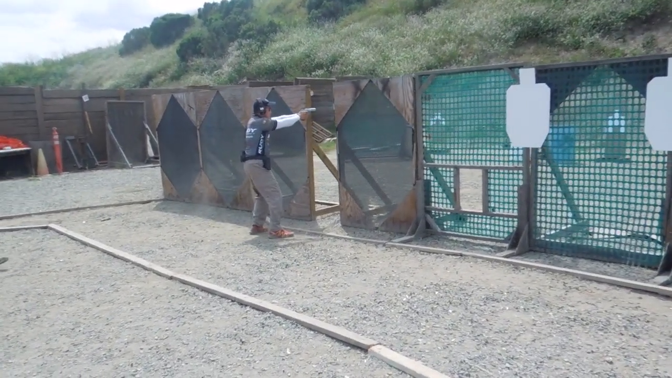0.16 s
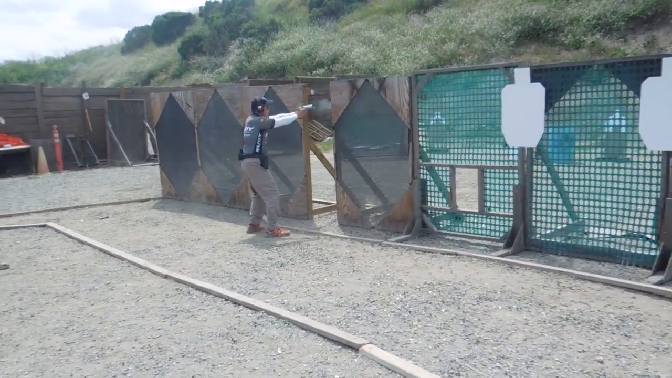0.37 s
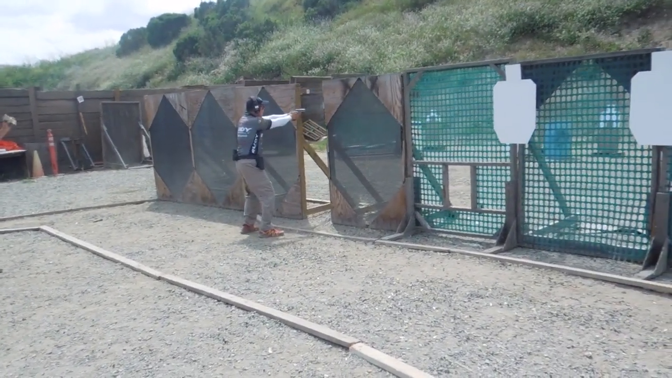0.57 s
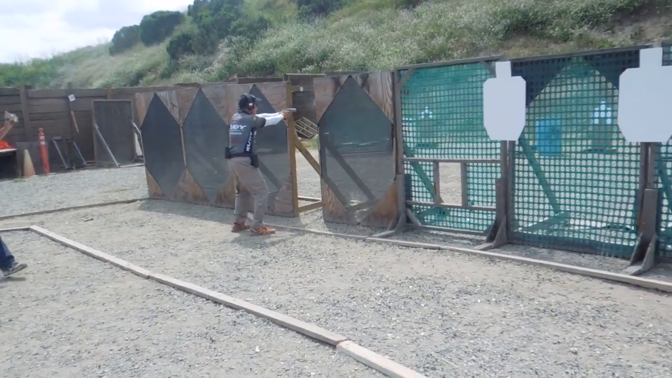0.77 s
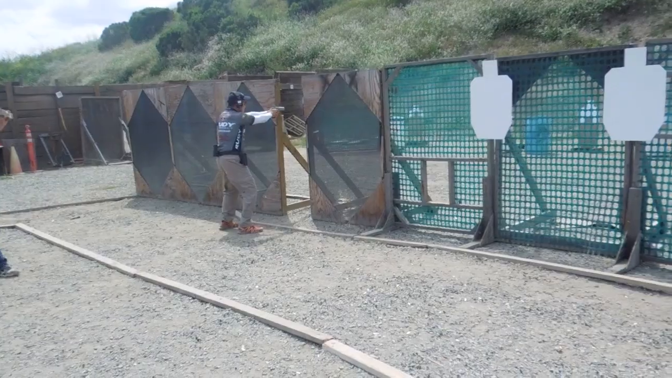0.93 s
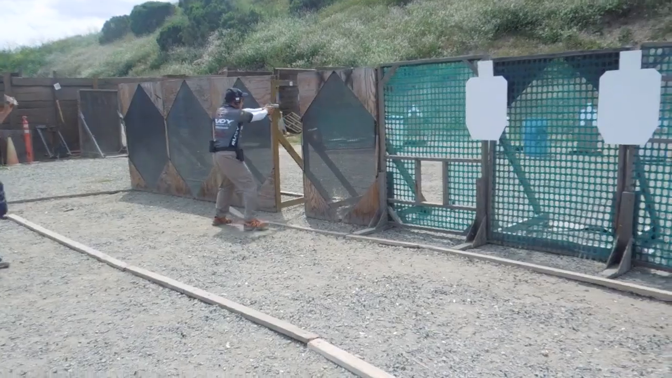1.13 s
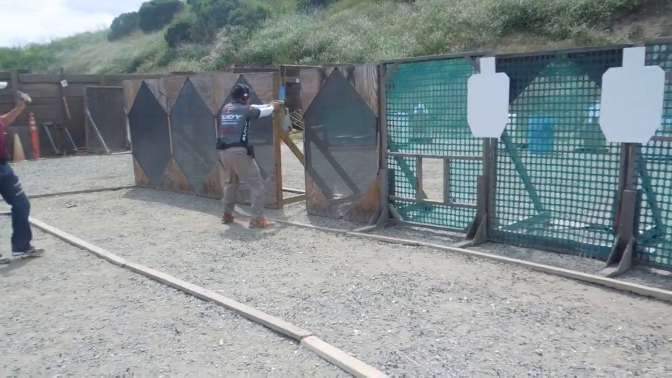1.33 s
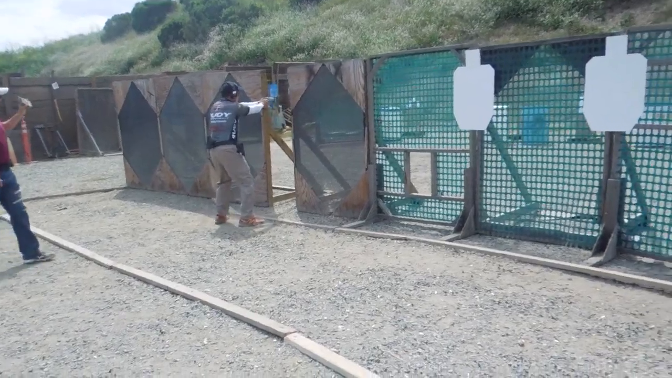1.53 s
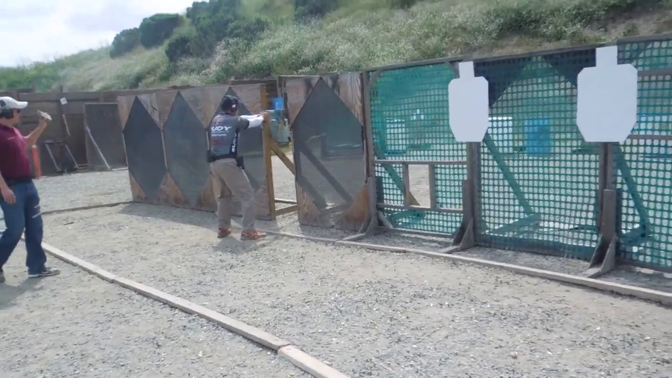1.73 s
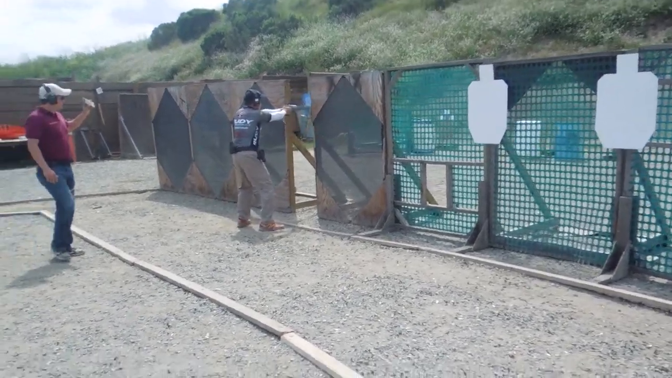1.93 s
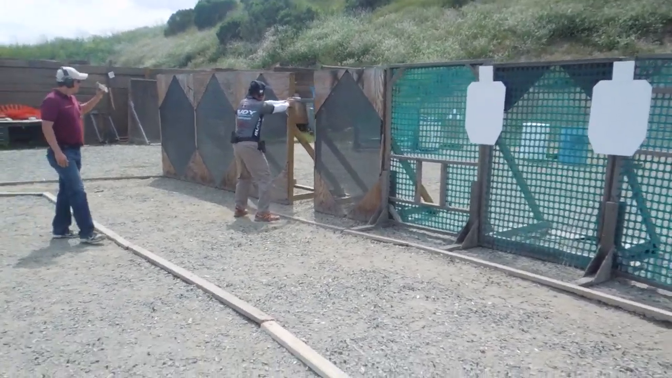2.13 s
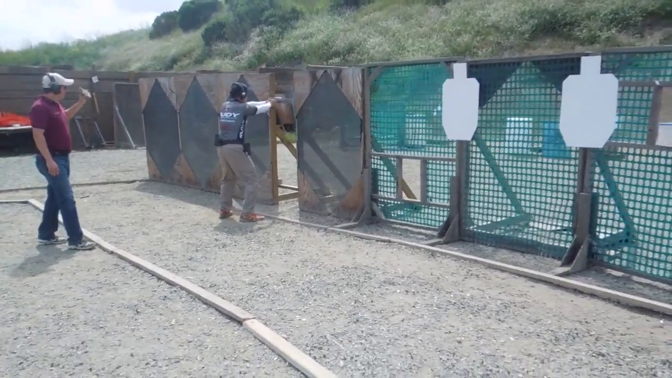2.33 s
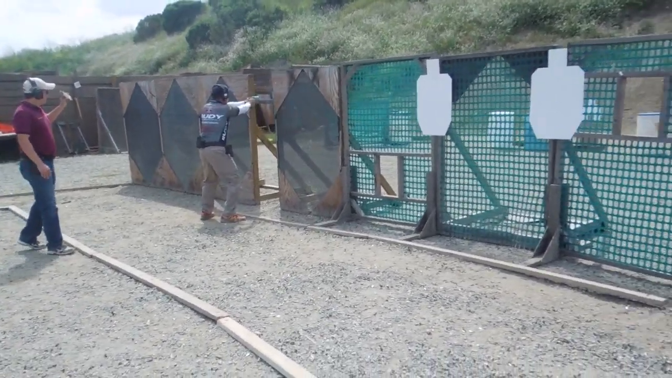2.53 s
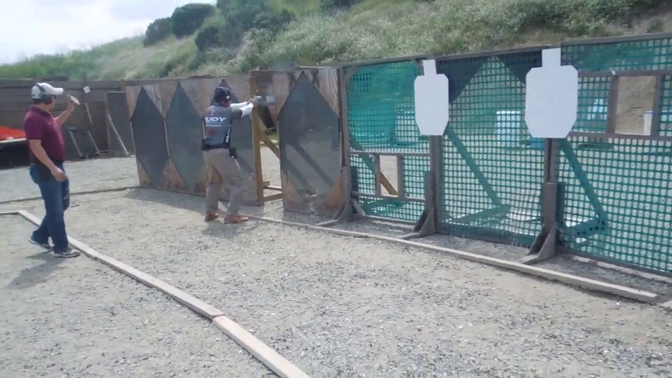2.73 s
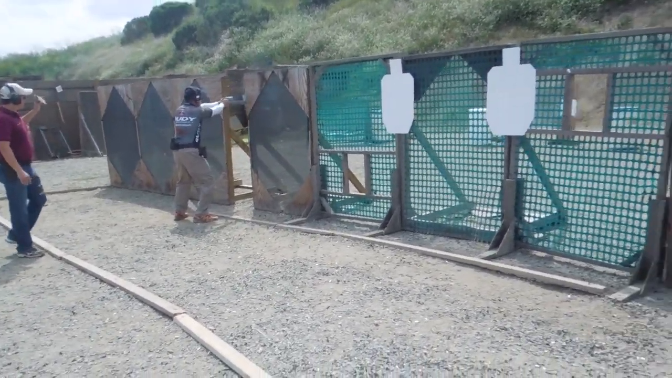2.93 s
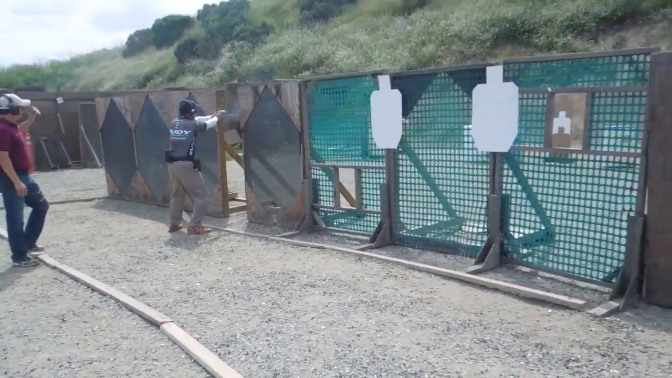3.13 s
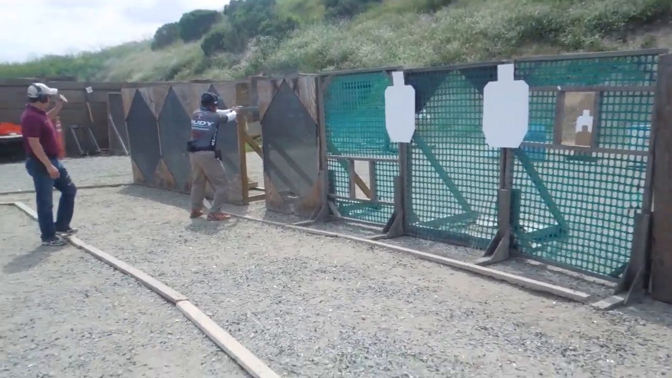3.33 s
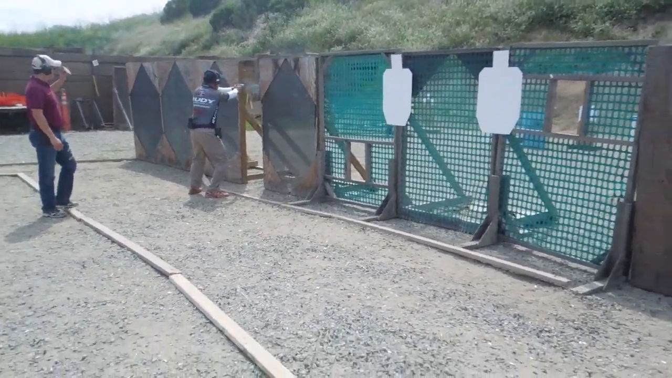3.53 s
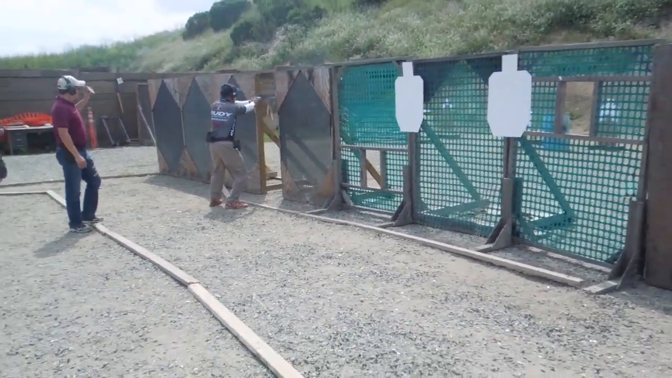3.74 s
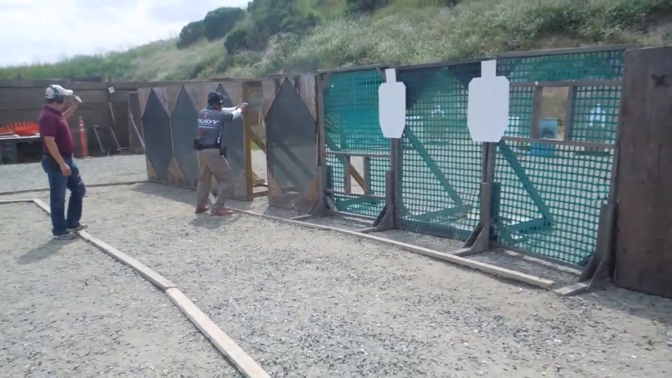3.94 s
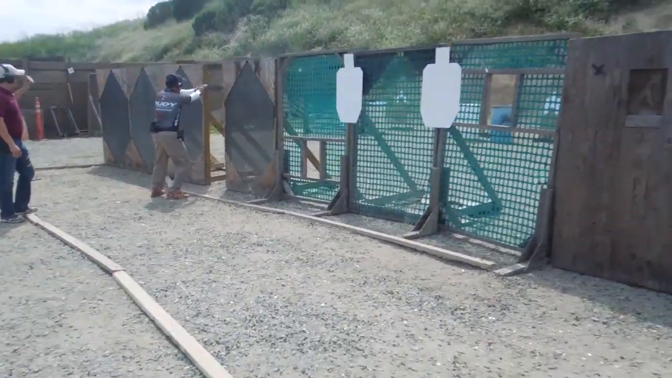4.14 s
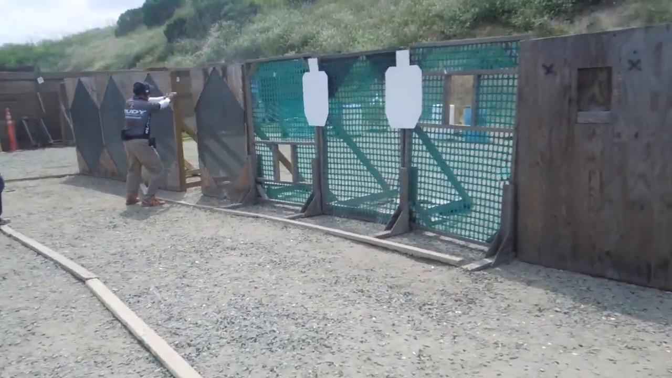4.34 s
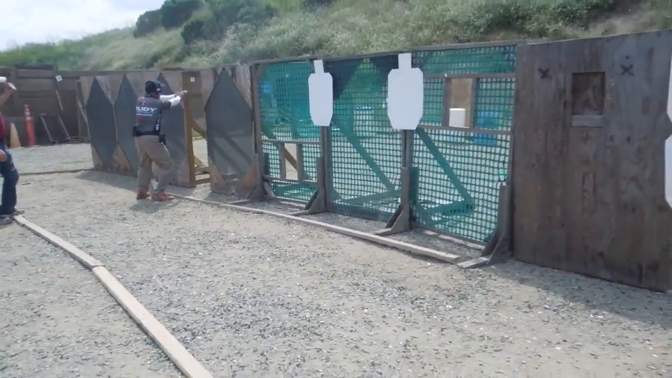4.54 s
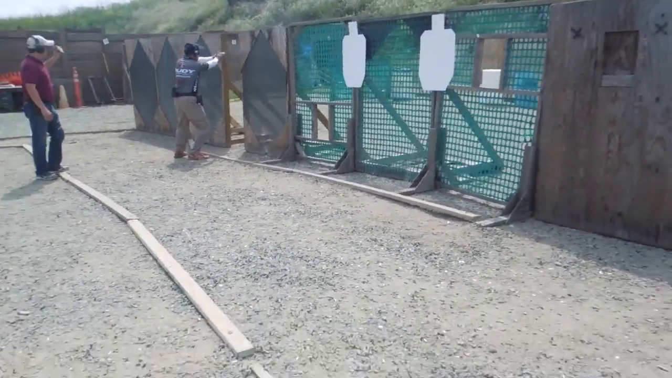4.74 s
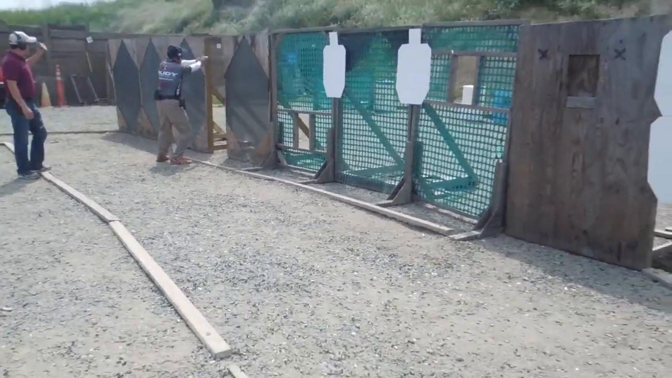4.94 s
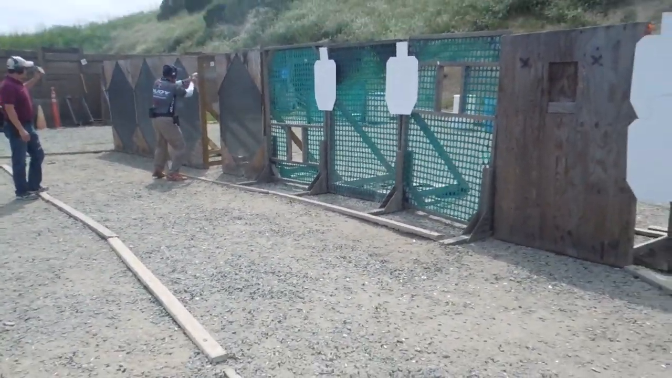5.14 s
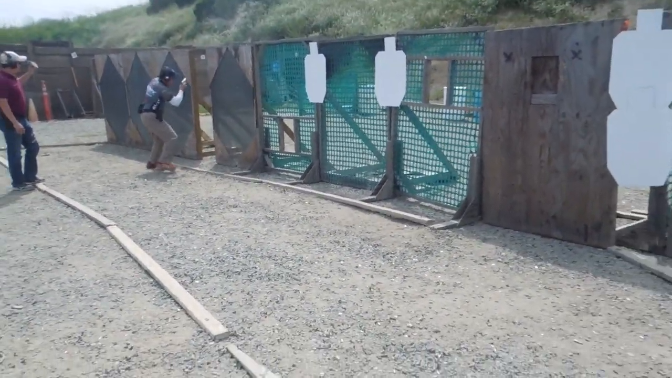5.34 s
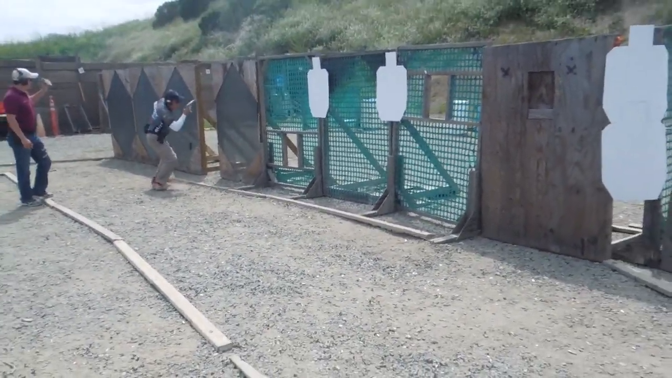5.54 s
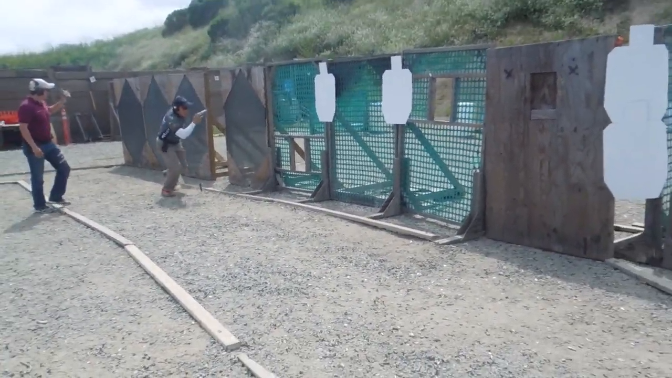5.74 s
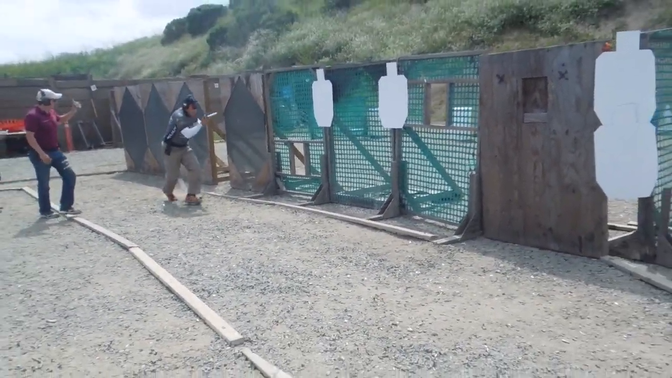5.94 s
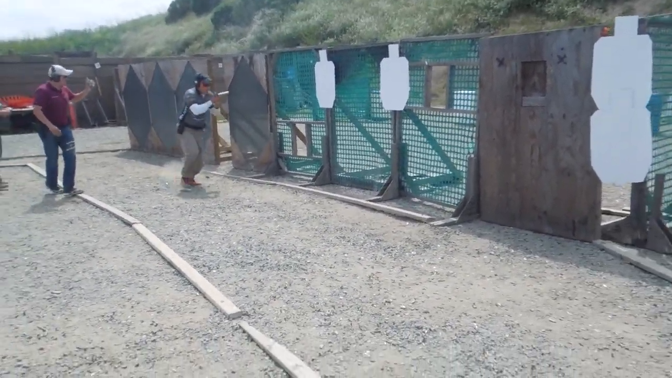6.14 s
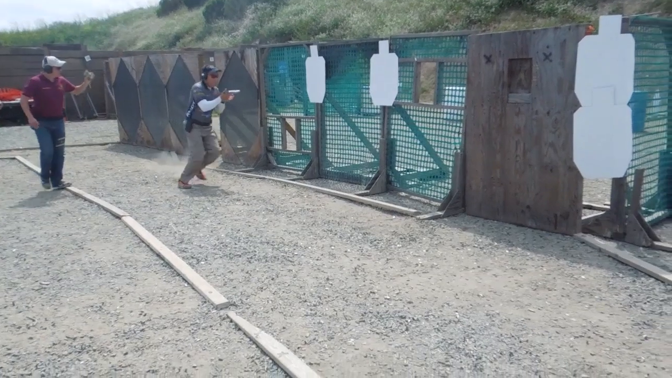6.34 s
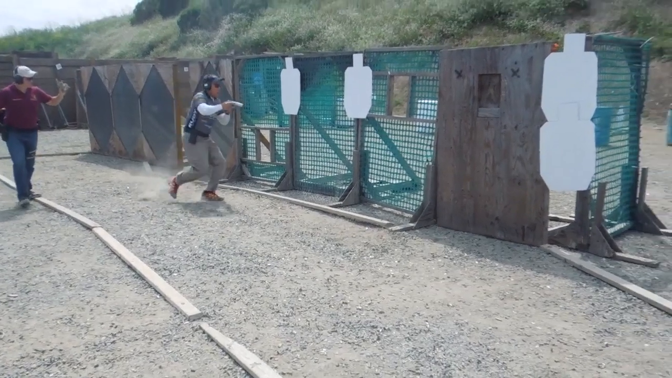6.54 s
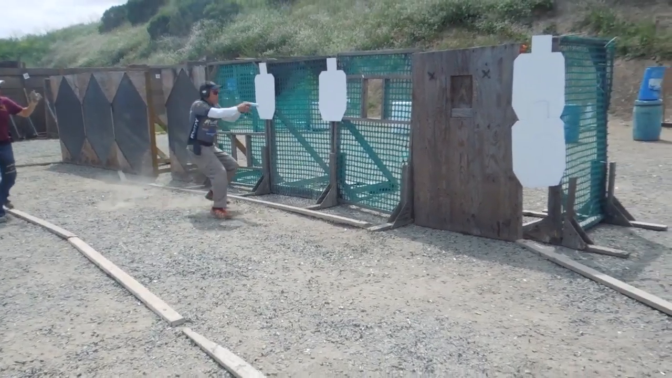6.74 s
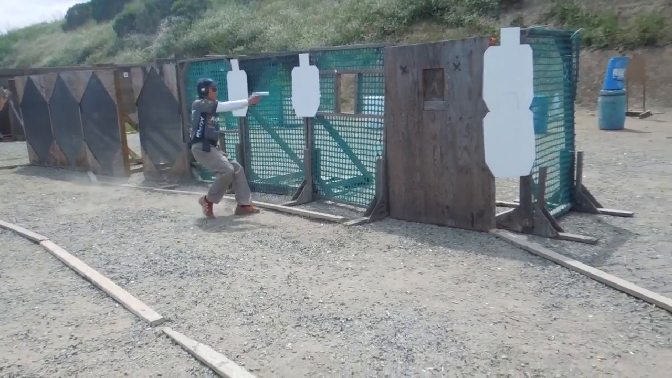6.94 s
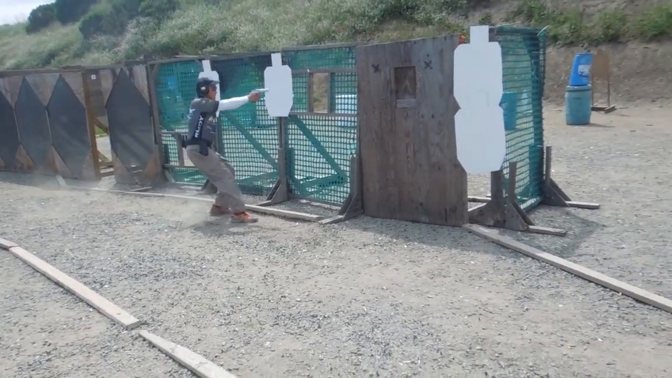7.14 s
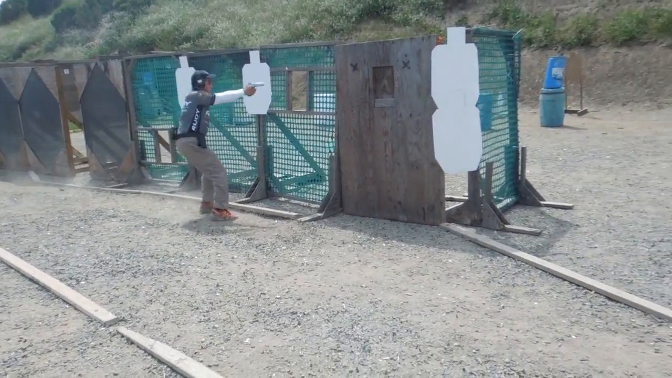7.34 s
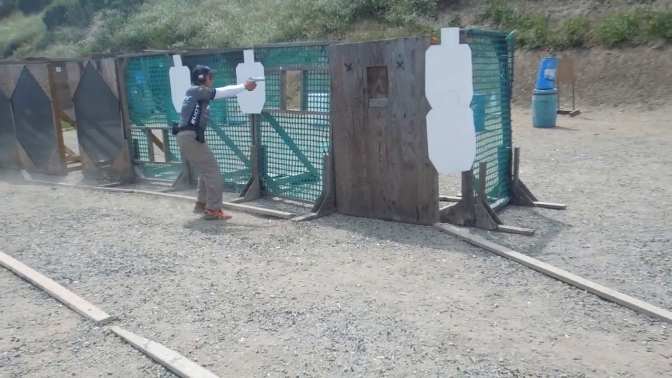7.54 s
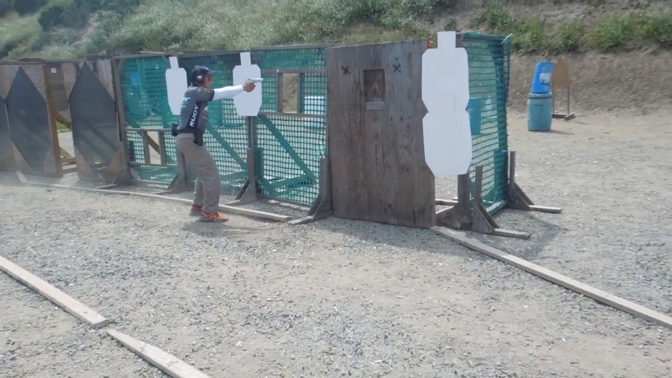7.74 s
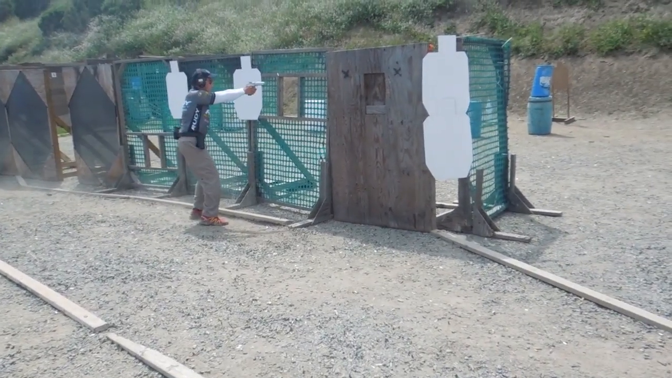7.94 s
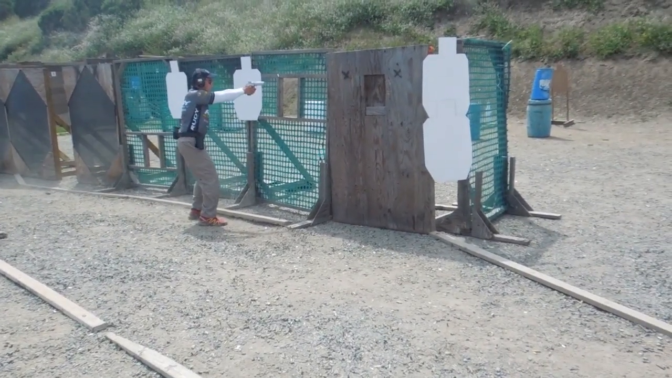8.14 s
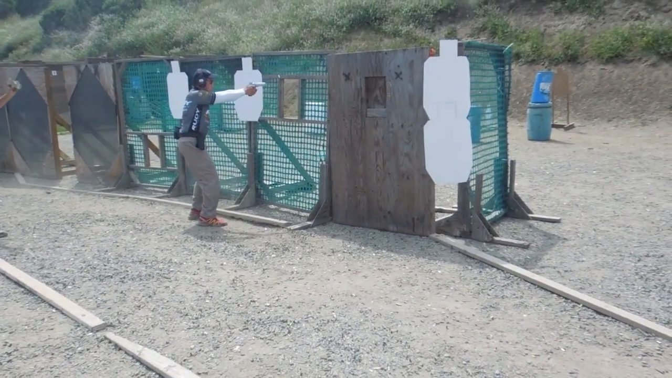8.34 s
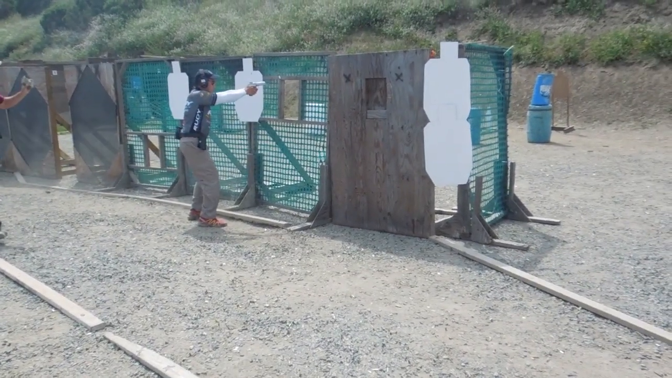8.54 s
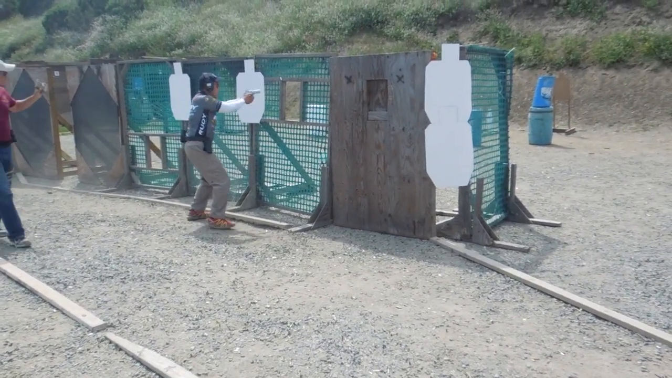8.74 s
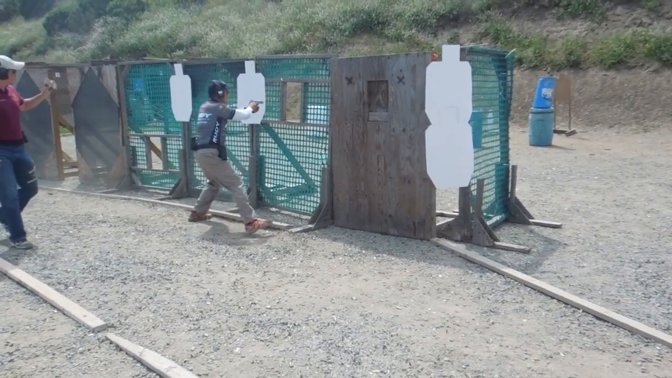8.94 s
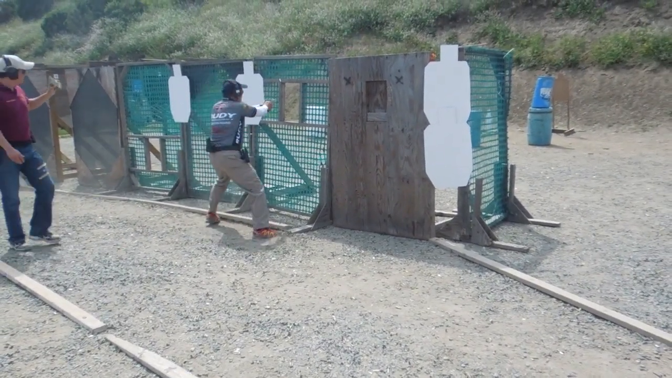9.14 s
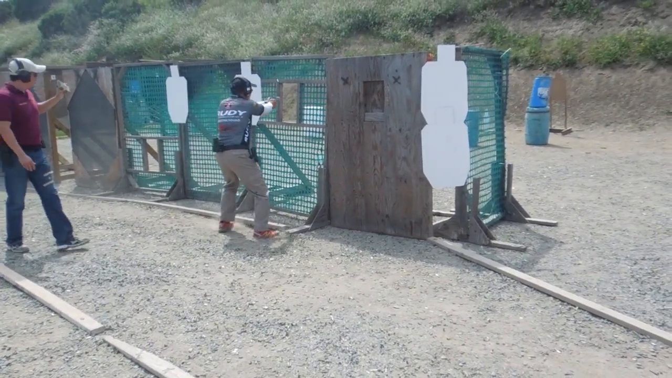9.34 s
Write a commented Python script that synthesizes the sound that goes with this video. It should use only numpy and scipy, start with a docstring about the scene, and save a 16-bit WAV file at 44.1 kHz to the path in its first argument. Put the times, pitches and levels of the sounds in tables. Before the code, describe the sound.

Sharp handgun blasts start very loud and clipped, then weaken as the string goes on, walls answering with quick slaps and banks with a fading wash. After a pause, shoes scuff and grind over gravel, spent cases tinkle, gear clicks, and low wind buffets the small outdoor stereo microphone. Two closing shots crack out half a second apart, the second softer.

```python
"""Pistol strings in a planked bay

Outdoors between plank walls, a pistol fired in quick strings overloads a small stereo microphone.
Shots are short noise bursts with wall echoes, dying scatter and a slow push on the diaphragm.
Wind on the ports and feet on gravel are shaped noise; clicks are noise snaps over knocks;
spent brass rings as beating tone pairs; short pitched pings are two more wall echoes, pops and ticks."""
import sys
import numpy as np
from scipy import signal
from scipy.fft import rfft, irfft, next_fast_len
from scipy.io import wavfile
from scipy.ndimage import uniform_filter1d, map_coordinates

SR = 44100
rng = np.random.default_rng(int(sys.argv[2]) if len(sys.argv) > 2 else 0)


def wrap_up_sound(samples):
    """Save the sound to the file named by the first command line argument, as 16-bit audio."""
    columns = np.atleast_2d(samples).T
    # keep every value between -1 and 1, then stretch to whole-number steps
    tamed = np.clip(columns, -1, 1)
    steps = np.round(tamed * 32767).astype(np.int16)
    wavfile.write(sys.argv[1], SR, steps)


def boost(x):
    """Linear amplitude factor 10**(x/20) for a level x in decibels (scalar or array-like)."""
    u = np.asarray(x, float) / 20
    return 10 ** u


N = 414099


def unit(x):
    """Scaled to rms 1."""
    return x / np.sqrt(np.mean(x ** 2) + 1e-20)


def along(points, hz):
    """Interpolates (Hz, value) points on a log frequency axis."""
    f, v = np.transpose(points)
    return np.interp(np.log(hz + 1), np.log(f + 1), v)


def coloured(x, points):
    """Filters x through a (Hz, dB) spectrum."""
    m = next_fast_len(x.shape[-1] + 4096)
    gain = boost(along(points, np.fft.rfftfreq(m, 1 / SR)))
    return irfft(rfft(x, m) * gain, m)[..., :x.shape[-1]]


def curve(rows):
    """One value per sample from (s, value) rows."""
    return np.interp(np.arange(N) / SR, *np.transpose(rows))


def wobble(rate):
    """A smooth random curve, rate knots a second."""
    knots = rng.standard_normal(int(N * rate / SR) + 4)
    return map_coordinates(knots, [np.arange(N) * rate / SR])


def stereo(pair, spectrum, side):
    """Left and right from a middle and an unrelated, weaker side signal; the middle has rms 1."""
    mid = coloured(pair[0], spectrum)
    edge = coloured(coloured(pair[1], spectrum), side)
    return np.array([mid + edge, mid - edge]) / np.sqrt(np.mean(mid ** 2))


def stereo_noise(length, spectrum, side):
    """Steady noise of one colour and width, length in samples."""
    return stereo(rng.standard_normal((2, length)), spectrum, side)


def patchy(x, patchy_db, bins, frames):
    """Random patches of gain over frequency and time."""
    z = signal.stft(x, nperseg=256)[2]
    field = rng.standard_normal(z.shape[1:])
    field = uniform_filter1d(uniform_filter1d(field, bins, 0), frames, 1)
    gain = boost(patchy_db * unit(field))
    return signal.istft(z * unit(gain), nperseg=256)[1][:, :x.shape[-1]]


def bounced(x, ms, share):
    """A surface close by sends the sound back again and again: a comb of peaks."""
    gap = np.zeros(round(ms * SR / 1000) - 1)
    return signal.lfilter([1], np.r_[1, gap, -np.clip(share, 0, .9)], x)


def add(track, s, sound):
    """Mixes a sound in at s; the track starts one second early."""
    track[..., round((s + 1) * SR):][..., :sound.shape[-1]] += sound


# Stereo width of the shots at the microphone. Each row: frequency in Hz, side under middle in dB.
SHOT_WIDTH = [(60, -0.5), (150, -9), (380, -13.5), (940, -26), (2340, -25), (5860, -5), (14700, -1.5)]


def dying(spectrum, t60):
    """One second of stereo noise; each frequency dies at its own speed."""
    hz, t, z = signal.stft(stereo_noise(SR, spectrum, SHOT_WIDTH), SR, nperseg=128)
    fall = boost(-60 * t / along(t60, hz)[:, None])
    return signal.istft(z * fall, SR, nperseg=128)[1][:, :SR]


# Colour of the muzzle blast. Each row: frequency in Hz, relative level in dB per Hz.
BLAST = [(60, -26), (150, -5.5), (400, -5.5), (700, -8), (1300, -7.5), (2300, -4), (3200, -5),
         (4300, -13.5), (8000, -14), (11500, -8.5), (14200, -19)]
# Band where the boards of the bay boom. Each row: frequency in Hz, share of the boom from 0 to 1.
BOOM = [(420, 0), (600, 1), (900, 1), (1300, 0)]


def muzzle_blast(lean):
    """A crack bounces in the gap between two panels and barks, over a slower, boomier tail."""
    t = np.arange(SR // 10) / SR
    crack = stereo_noise(len(t), BLAST, SHOT_WIDTH) * boost(-60 * (t / 0.0043) ** 2)
    crack = bounced(crack, ms=1.4, share=0.56)
    # the tone of the gap grows with the lean
    bark = (.25 + .04 * lean) * np.sin(2 * np.pi * 790 * t) * np.exp(-((t - .003) / 0.0014) ** 2)
    tail = coloured(stereo_noise(len(t), BLAST, SHOT_WIDTH), np.multiply(BOOM, [1, 6]))
    return coloured(crack + bark, [(7000, 0), (12000, 4)]) + boost(-9.5 - 60 * t / 0.065) * tail


def diaphragm(push_db):
    """The blast pushes the diaphragm in; it swings back slowly, no further than its travel allows."""
    t = np.arange(SR) / SR
    travel = np.tanh(boost(push_db) / 1.3)
    push = -boost(push_db) * t / .006 * np.exp(1 - t / .006 - (t / (.031 - .021 * travel)) ** 2)
    settle = np.exp(-t / .06) - .37 * travel * np.exp(-t / .135)
    swing = travel * (1 - np.exp(-(t / (.048 - .022 * travel)) ** 2)) * settle
    return push + swing


# Dying away of the near boards. Each row: frequency in Hz, time to fall 60 dB in seconds.
NEAR_T60 = [(200, 0.36), (2000, 0.3), (12000, 0.31)]


def near_boards(boom):
    """The boards stand some metres off: their patchy scatter arrives late."""
    t = np.arange(SR) / SR
    boards = coloured(dying(BLAST, NEAR_T60), boom)
    return patchy(boards, 2.8, bins=4, frames=2) * (0.062 + np.tanh((t / 0.036) ** 5))


# Colour of the far earth banks. Each row: frequency in Hz, relative level in dB per Hz.
BANKS = [(90, -16), (250, 0.5), (700, -16.5), (1200, -14.5), (2300, -9.5), (3300, -9), (4500, -15.5),
         (6200, -13), (9000, -21), (14200, -28)]
# Dying away over the banks. Each row: frequency in Hz, time to fall 60 dB in seconds.
FAR_T60 = [(200, 0.69), (2000, 0.7), (6000, 0.54), (12000, 0.68)]


def far_banks():
    """Earth banks scatter the shot back as a patchy wash that swells in and dies."""
    t = np.arange(SR) / SR
    return patchy(dying(BANKS, FAR_T60), 2.7, bins=6, frames=2) * (1 - np.exp(-(t / 0.035) ** 2))


# Colour of a wall echo. Each row: frequency in Hz, level in dB.
SLAP = [(150, -6.5), (600, -4), (2000, 1.5), (3300, -5.5), (4500, -9), (14000, -10.5)]
# Bass and treble lost to walls and air. Each row: frequency in Hz, gain in dB per 50 ms of delay.
DULLING = [(800, -2.5), (1500, 0), (3000, 0), (5000, -1.5), (14000, -3)]


def slap(late, boom, ping_share, turn):
    """A wall returns a noise slap and the crack as one short ping, duller the later it comes."""
    t = np.arange(SR // 10) / SR
    noise = coloured(stereo_noise(len(t), SLAP, SHOT_WIDTH), boom)
    shape = np.tanh(t / 0.00025) * (boost(-60 * t / 0.014) + boost(-11.5 - 60 * t / 0.05))
    tone = np.sin(2 * np.pi * rng.uniform(1500, 2600) * t)
    ping = ping_share * tone * np.exp(-((t - .0009) / 0.00031) ** 2)
    hz, db = np.transpose(DULLING)
    return coloured(noise * shape + ping / (1 + turn), np.c_[hz, db * late / .05])


# The shooter's two stands in the bay. Each row: start in seconds, then echo delays in ms
# off barricade, first wall, second wall and far wall.
STANDS = [(-1, 76, 60.5, 129.5, 156.5), (6, 32, 44, 88, 155)]
# Echoes off barricade, first, second and far wall. Each row: level in dB at loudness 0,
# dB per dB of loudness, dB per unit of lean.
ECHOES = [(-11, .6, .4), (3.5, .6, -.1), (-6.5, .7, .2), (-6, .75, -.45)]
# Echo shift off the same four surfaces. Each entry: delay in ms per unit of lean.
SHIFT = [-1.6, 0, -1, .18]
# Clean ping off the same four surfaces. Each entry: strength against the slap, as a factor.
PING = [.2, .6, 1.1, .8]


def wall_echoes(out, s, loud_db, lean, aim_db, stand, boom):
    """Four surfaces each answer at their own delay, then twice more after further crossings."""
    surfaces = zip(STANDS[stand][1:], SHIFT, ECHOES, [0, 0, 0, aim_db], PING)
    for ms, shift, (db, follow, turned), aimed_db, ping_share in surfaces:
        level_db = db + aimed_db + follow * loud_db + turned * lean
        for turn in range(3):
            # each further crossing of the bay takes 161 ms and costs 24 dB
            late = (ms + shift * lean + turn * 161) / 1000
            add(out, s + late, boost(level_db - 24 * turn) * slap(late, boom, ping_share, turn))


# Pistol shots. Each row: start in seconds, loudness in dB, slow push on the diaphragm in dB,
# muzzle lean into the gap between panels (SHIFT turns it into ms), aim towards the far wall in dB.
SHOTS = [(-.29, 9, -20, -1, -4), (.096, 10, 20.5, 1.5, -3), (.512, -5, 13, 4.5, 0),
         (1.909, 0, -16.5, 5, -12.5), (2.397, -9.5, 9.5, 6, -3.5), (2.846, -15, 10.5, 8.5, -4),
         (3.1985, -20, -8, 7.5, -4), (3.64, -20, -4.5, 13.5, -3), (3.979, -25, -8.5, 11, -3),
         (4.735, -19, -21, 14.5, 0), (5.131, -24, -20.5, 17.5, -0.5), (8.138, 10, -14.5, 1.5, -2),
         (8.649, -5, -10.5, 1.5, -4)]
# Boom of boards and walls. Each entry: gain in dB at one of the two stands.
BOOM_DB = [3, 7]


def shots():
    """Muzzle blast, scatter from near boards and far banks, wall slaps and a slow diaphragm push."""
    out = np.zeros((2, N + 3 * SR))
    # single boards stand out of the scatter
    uneven = boost(2.5 * (wobble(250) + 0.25 * wobble(60)))
    for s, loud_db, push_db, lean, aim_db in SHOTS:
        stand = int(s > STANDS[1][0])
        boom = np.multiply(BOOM, [1, BOOM_DB[stand]])
        # the blast stands 22 dB over the scatter, up to a ceiling
        add(out, s, boost(min(loud_db + 22, 23)) * muzzle_blast(lean))
        add(out, s, diaphragm(push_db))
        add(out, s, boost(loud_db) * np.roll(uneven, -round(s * SR))[:SR] * near_boards(boom))
        add(out, s, boost(-13 + 0.69 * loud_db) * far_banks())
        wall_echoes(out, s, loud_db, lean, aim_db, stand, boom)
    return out[:, SR:SR + N]


# Wind strength at the microphone, as flutter on the ports. Each row: time in seconds, level in dB.
WIND = [(.95, -58), (1.16, -59), (1.72, -50), (4.35, -63), (4.7, -67.5), (5.3, -55), (5.4, -48),
        (5.57, -51.5), (5.7, -63), (6.14, -50), (6.47, -54), (6.65, -37.5), (7.03, -42), (7.37, -29),
        (7.61, -48), (7.67, -36), (8.11, -26), (8.7, -35.5), (9.39, -39)]
# Gusts that thump the ports. Each row: peak in seconds, rise in seconds per 20 dB,
# time to fall 60 dB in seconds, level in dB.
GUSTS = [(7.151, 0.11, 1, -36), (7.369, 0.12, 0.8, -24), (7.47, 0.072, 0.21, -27), (7.643, 0.0094, 2, -20),
         (7.72, 0.056, 0.83, -22), (7.84, 0.018, 0.42, -30), (7.961, 0.025, .9, -27.5)]
# Colour of the port flutter. Each row: frequency in Hz, relative level in dB per Hz.
FLAP = [(8, -15), (25, -0.5), (55, -7), (100, -22.5), (200, -59.5)]
# Colour of the wind roar before its peaks are choked. Each row: frequency in Hz, relative dB per Hz.
BUFFET = [(29, -29.5), (55, -3), (135, 2.5), (265, -5), (500, -21), (650, -40), (1100, -120)]
# Stereo width of wind, feet and clicks. Each row: frequency in Hz, side under middle in dB.
LOOSE_WIDTH = [(60, -1.5), (240, -1), (940, -29), (3710, -21), (14700, -3)]


def wind():
    """Slow flutter on the ports; a lumpy roar grows with it and swells in gusts."""
    t, flutter_db = np.arange(N) / SR, curve(WIND)
    flutter = unit(boost(4.5 * wobble(11)) * stereo_noise(N, FLAP, LOOSE_WIDTH))
    # -66 dB of roar in a calm wind of -55.5 dB, 1.1 dB more per dB of wind above that
    swell = boost(-66 + 1.1 * (flutter_db + 55.5))
    for s, rise, t60, db in GUSTS:
        rising_db, falling_db = 20 * np.clip((s - t) / rise, 0, 9), 60 * np.clip((t - s) / t60, 0, 3)
        swell = swell + boost(db - rising_db - falling_db)
    lumps = boost(5 * np.tanh(wobble(22))) * boost(1.5 * wobble(60))
    # the ports choke the strongest puffs
    choked = np.tanh(stereo_noise(N, BUFFET, LOOSE_WIDTH) / 2)
    return boost(flutter_db) * flutter + swell * unit(lumps * choked)


def grains(spike_db):
    """Noise pair with a fast random level, so that single grains stick out."""
    return rng.standard_normal((2, N)) * boost(spike_db * wobble(500))


def stroke(s, length):
    """Level of one sole stroke: quick start, 5 dB of sag over its length, then a 40 ms fade."""
    t = np.arange(N) / SR
    fade = np.clip((s + length - t) / 0.04 + 1, 0, 1)
    return np.clip((t - s) / 0.0103, 0, 1) * boost(-5 * (t - s) / length) * fade


def jingle(grind, count):
    """Loose cases: scattered short rings, as strong as the gravel is stirred."""
    out, t = np.zeros((2, N + 2 * SR)), np.arange(SR // 8) / SR
    for when, pitch, size, life, lag in rng.random((count, 5)):
        phase_gap = np.array([[0], [2.2 * lag - 1.2]])  # left to right, radians
        ring = np.sin(2 * np.pi * (10400 + 1700 * pitch) * t + phase_gap)
        level = grind[int(when * N)] * boost(7.5 - 5.9 * size)
        fall = boost(-60 * t / (0.028 + 0.22 * life ** 2))
        add(out, when * N / SR, level * fall * np.tanh(t / .001) * ring)
    return out[:, SR:SR + N]


# Stir of loose gravel under the steps. Each row: time in seconds, level in dB.
MOVES = [(.95, -71), (1.25, -60), (1.87, -52.5), (4.35, -79), (4.56, -69), (5.45, -71.5), (7.32, -43),
         (8.11, -44.5), (9.0, -76), (9.21, -60), (9.39, -58)]
# Soles on gravel. Each row: start in seconds, length in seconds, scuff in dB, gravel hiss in dB.
STEPS = [(1.445, 0.134, -50, -63.5), (1.817, 0.1, -47, -53.5), (6.109, 0.049, -58, -49),
         (6.357, 0.13, -52.5, -49), (6.549, 0.09, -46.5, -48.5), (6.709, 0.0573, -50.5, -41),
         (6.82, .2, -34.5, -34), (7.061, 0.083, -39, -37), (7.22, 0.13, -36, -30.5), (7.378, 0.1, -40, -58),
         (7.712, 0.06, -37, -34), (9.324, 0.13, -55, -62)]
# Colour of a dull scuff. Each row: frequency in Hz, relative level in dB per Hz.
SCUFF = [(200, -29), (400, -2.5), (1250, -5), (2500, -10.5), (4500, -20), (9000, -57.5)]
# Colour of bright grit. Each row: frequency in Hz, relative level in dB per Hz.
GRIT = [(2000, -36.5), (3500, -9.5), (8000, -6), (11500, 1), (14200, -4.5)]
# One hollow scrape. The row: start in seconds, time to fall 60 dB in seconds, level in dB,
# then its colour as frequency in Hz and relative level in dB.
HOLLOW = (7.465, 0.33, -25, [(420, -25), (540, 3.5), (600, -7), (660, 6.5), (820, -34)])


def feet():
    """Soles drag and stones grind in clumped grains; loose cases jingle under them."""
    t = np.arange(N) / SR
    stir_db = curve(MOVES)
    drag, grind = boost(stir_db), boost(stir_db - 2.5)  # levels of scuff and of gravel hiss
    for s, length, scuff_db, grit_db in STEPS:
        step = stroke(s, length)
        drag, grind = drag + boost(scuff_db) * step, grind + boost(grit_db) * step
    clump = wobble(40)  # shared by scuff and grit
    scuff = bounced(stereo(grains(2.2), SCUFF, LOOSE_WIDTH), ms=1.68, share=0.33)
    scuff = unit(boost(2 * wobble(90) + 1.6 * clump) * patchy(scuff, 3, bins=3, frames=3))
    grit = patchy(stereo(grains(2.0), GRIT, LOOSE_WIDTH), 2.2, bins=8, frames=4)
    grit = unit(boost(1.5 * wobble(87) + 1.5 * clump) * grit)
    s, t60, db, tone = HOLLOW
    scrape = boost(db - 60 * np.abs(t - s) / t60) * np.clip((t - s) / .008, 0, 1)
    hollow = scrape * stereo(grains(2.5), tone, LOOSE_WIDTH)
    return drag * scuff + grind * grit + hollow + jingle(grind, count=240)


# Short pitched pings: the first two are wall echoes of the shot before the start, the others
# brief pops and ticks. Each row: centre in seconds, pitch in Hz, level in dB.
PITCHED_PINGS = [(.001, 1048, -12.5), (0.03, 1050, -18), (1.735, 1690, -25.5), (1.877, 1110, -30),
                 (1.896, 1412, -14), (6.803, 1695, -30), (9.208, 2070, -37.5)]


def pitched_pings():
    """Each ping, be it echo, pop or tick, is a couple of cycles of one tone."""
    out, t = np.zeros(N + 2 * SR), np.arange(-200, 200) / SR
    for s, hz, db in PITCHED_PINGS:
        add(out, s + t[0], boost(db) * np.sin(2 * np.pi * hz * t) * np.exp(-(t * hz / 0.77) ** 2))
    return out[SR:SR + N]


# Stone and gear clicks. Each row: start in seconds, bright snap in dB, dull knock in dB.
CLICKS = [(1.347, -44, -61), (1.6872, -38.5, -39.5), (5.8407, -37, -60), (5.896, -42, -46.5),
          (6.2963, -40, -68), (6.419, -17, -42), (6.4652, -34, -59), (6.6191, -30, -34.5),
          (6.6277, -30, -30.5), (6.8326, -16.5, -41), (7.256, -19.5, -46), (7.3146, -32, -22.5),
          (7.3795, -19.5, -31), (7.4026, -21, -33), (7.498, -35, -32), (7.551, -19.5, -41),
          (7.6121, -29, -67), (7.845, -30.5, -39)]


def clicks():
    """Each click is a bright snap with a duller knock under it."""
    out, t = np.zeros((2, N + 2 * SR)), np.arange(SR // 20) / SR
    for s, snap_db, knock_db in CLICKS:
        snap = boost(snap_db - 60 * t / 0.032) * stereo_noise(len(t), GRIT, LOOSE_WIDTH)
        knock = boost(knock_db - 60 * t / 0.049) * stereo_noise(len(t), SCUFF, LOOSE_WIDTH)
        add(out, s, snap + knock)
    return out[:, SR:SR + N]


# Spent brass cases. Each row: start in seconds, upper pitch in Hz, upper ring in dB,
# lower ring in dB, time to fall 60 dB in seconds.
BRASS = [(1.348, 11520, -32.5, -63, 0.085), (1.519, 11490, -34.5, -64, 0.17),
         (2.716, 11150, -48, -56.5, 0.34), (6.517, 10800, -38, -52, 0.14), (6.618, 11640, -28, -50, 0.075),
         (6.889, 11200, -31, -60, 0.24), (6.998, 11800, -27, -46, 0.12), (7.174, 11200, -27, -40, 0.11),
         (7.19, 10040, -31, -50, 0.24), (7.257, 11800, -40, -22, 0.099), (7.385, 11600, -25, -55, 0.22),
         (7.27, 12000, -33, -60, 0.2), (7.761, 10200, -43, -60, 0.08), (8.028, 11260, -50, -32.5, 0.043)]
# A case's two rings. Each entry: pitch as a ratio to the upper pitch.
CASE = [1, .7]


def brass():
    """Each ring of a case is a close pair of wall modes, so its tone beats."""
    out, t = np.zeros((2, N + 2 * SR)), np.arange(SR // 2) / SR
    for (s, hz, *levels, t60), (split, lag, pan) in zip(BRASS, rng.random((len(BRASS), 3))):
        balance = boost([[3 * pan - 1.4], [1.4 - 3 * pan]])
        for ratio, db in zip(CASE, levels):
            phase = 2 * np.pi * ratio * hz * t + np.array([[0], [2.3 * lag - 1.2]])
            # the second mode lies 25 to 55 Hz higher
            ring = np.sin(phase) + 0.86 * np.sin(phase + 2 * np.pi * (25 + 30 * split) * t)
            add(out, s, boost(db - 60 * t / t60) * (1 - np.exp(-t / 0.00055)) * ring * balance)
    return out[:, SR:SR + N]


def scene():
    """Everything the microphone meets; shots and wind lean slightly left (dB per channel)."""
    blasts, air = boost([[.25], [-.25]]) * shots(), boost([[.9], [-.9]]) * wind()
    return blasts + air + feet() + pitched_pings() + clicks() + brass()


def top_cut(x):
    """Nothing passes above the cut-off."""
    return signal.sosfilt(signal.butter(12, 15260, fs=SR, output="sos"), x)


# Band limit of the microphone. Each row: frequency in Hz, gain in dB.
MIC = [(14200, 0), (14700, -40)]


def record(dry):
    """The input stage bends loud peaks over towards a ceiling of .97; then the band is limited."""
    clipped = dry / (1 + np.abs(dry / .97) ** 6) ** (1 / 6)
    mix = np.clip(coloured(clipped, MIC), -1, 1)
    return top_cut(mix)


dry = scene()
out = record(dry)
wrap_up_sound(out)
```